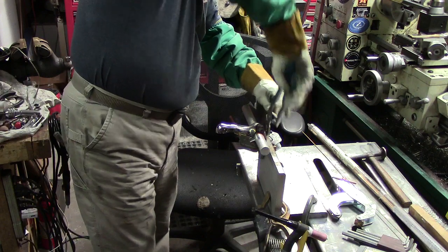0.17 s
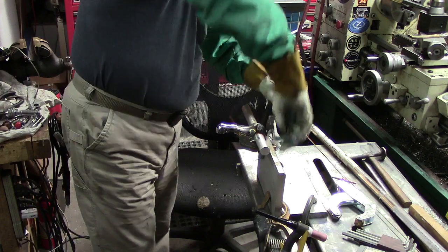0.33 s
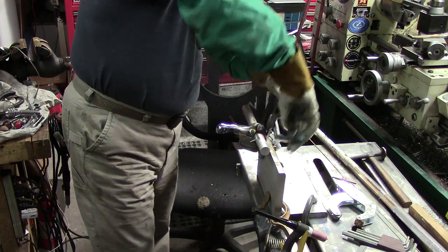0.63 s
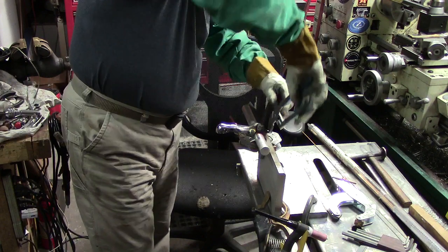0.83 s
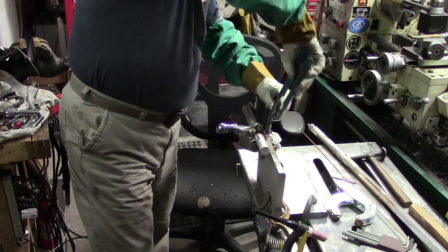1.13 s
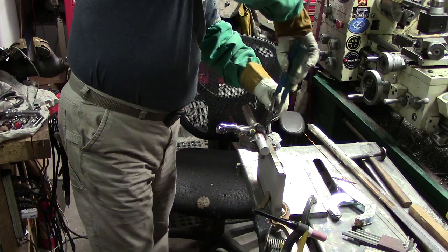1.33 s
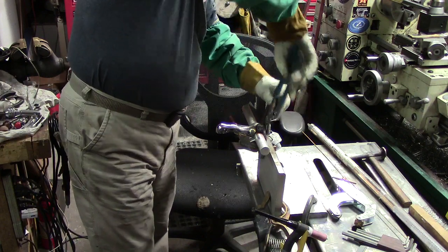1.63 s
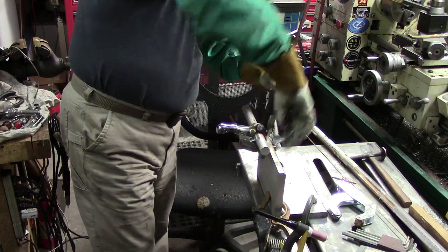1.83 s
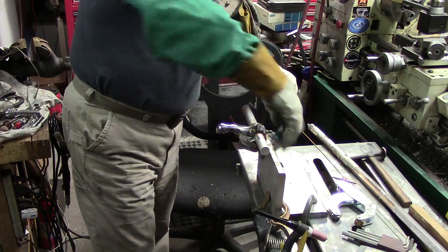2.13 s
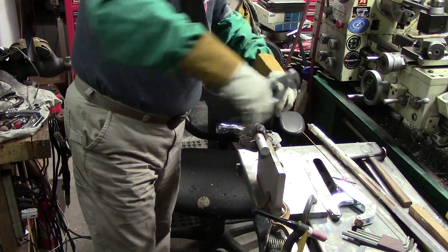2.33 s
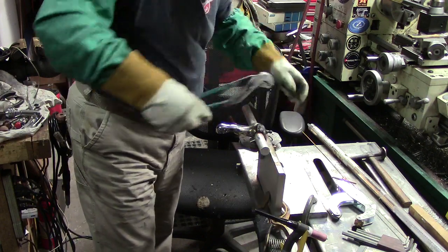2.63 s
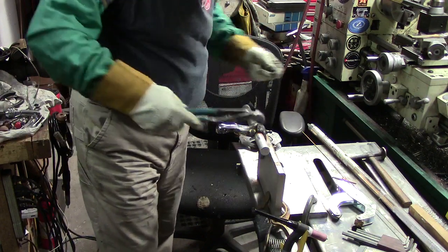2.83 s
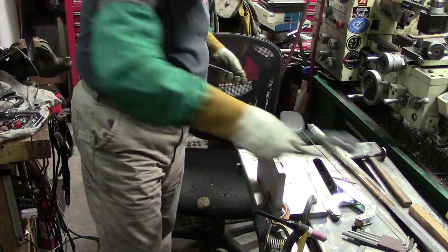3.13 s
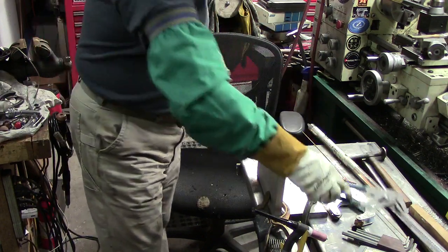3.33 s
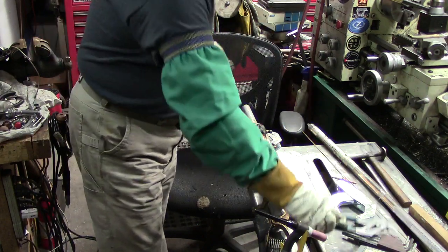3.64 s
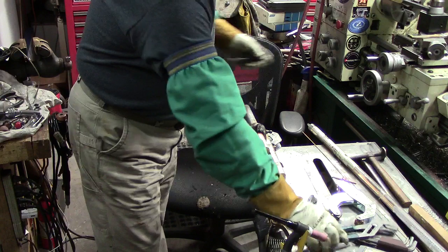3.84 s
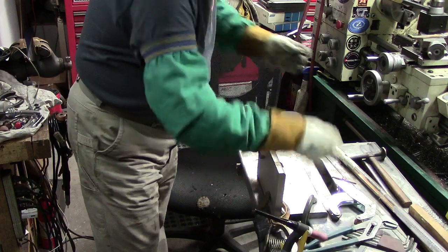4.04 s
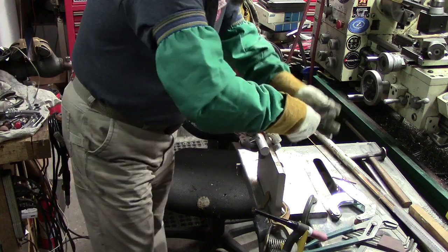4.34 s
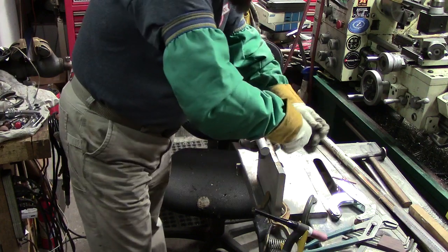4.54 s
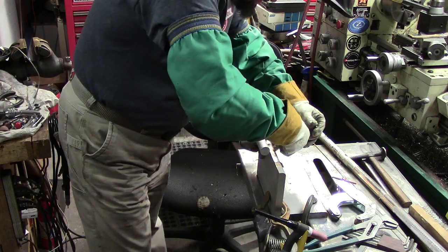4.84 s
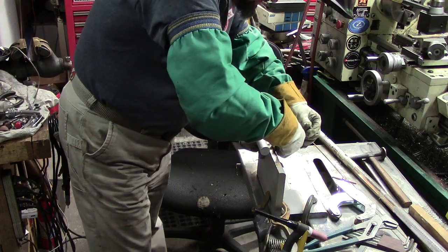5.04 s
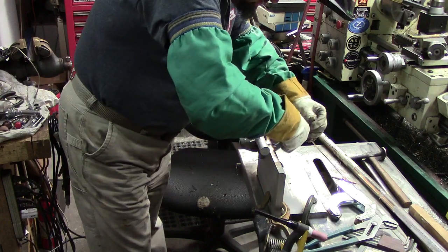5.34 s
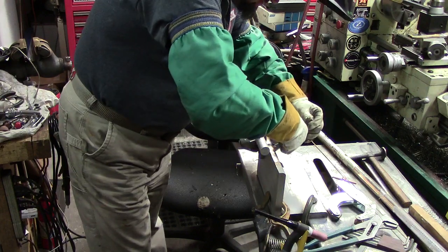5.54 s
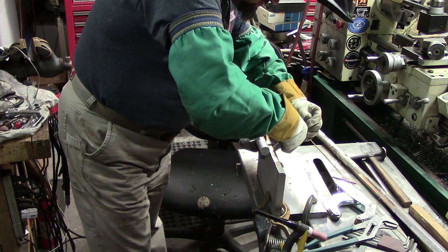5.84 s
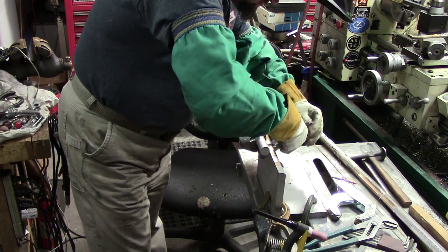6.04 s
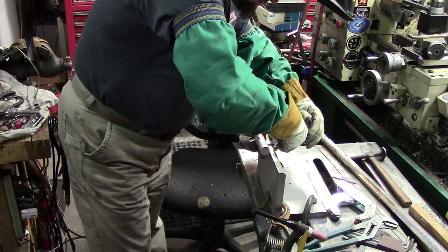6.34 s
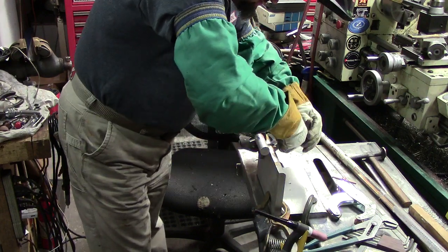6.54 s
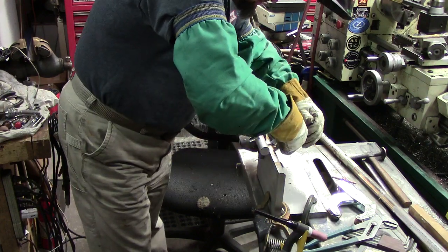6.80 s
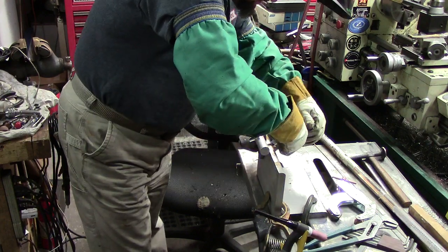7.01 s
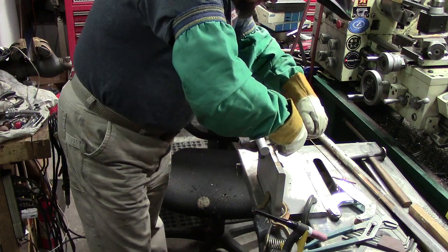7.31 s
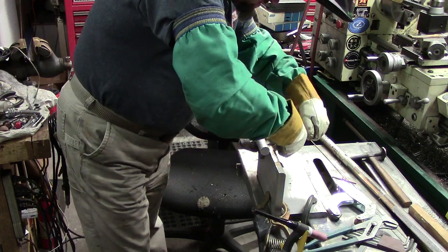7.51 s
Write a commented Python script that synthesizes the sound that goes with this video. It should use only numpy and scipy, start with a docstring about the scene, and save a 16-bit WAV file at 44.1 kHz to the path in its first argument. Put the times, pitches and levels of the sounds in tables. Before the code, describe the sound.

Steady low fan hum and rushing air, then a sharp metal clack, a loud wrench clatter on a bench, loose tool clinks and faint steel ticks.

```python
"""A steel wrench clacks free of a clamped part and lands on a steel bench, with light steel ticks on the part
before and after: each contact is a noise crack, a grainy rattle and ringing sines with a room tail.
Loose tools clink as a torch is lifted. Arm sweeps add soft low gusts of noise.
Behind it a TIG welder's fan drones: a blade tone with fainter whines over coloured noise for the rushing air.
A limiter ducks the whole sound under loud blows."""
import sys
import numpy as np
from scipy import signal
from scipy.fft import rfft, irfft, next_fast_len
from scipy.io import wavfile
from scipy.ndimage import uniform_filter1d, map_coordinates

SR = 44100
rng = np.random.default_rng(int(sys.argv[2]) if len(sys.argv) > 2 else 0)


def pcm_store(signal):
    """Save signal as 16-bit PCM."""
    levels = np.round(np.clip(np.atleast_2d(signal), -1, 1) * 32767)
    wavfile.write(sys.argv[1], SR, levels.astype(np.int16).T)


N = 338107


def amp(db):
    """Turn decibels into a gain."""
    return 10 ** (np.asarray(db) / 20)


def unit(x):
    """Scale a sound to an rms level of 1."""
    return x / np.sqrt(np.mean(x ** 2) + 1e-20)


def along(points, hz):
    """Read a curve of (Hz, value) points, joined by straight lines on a log frequency axis."""
    point_hz, value = np.transpose(points)
    return np.interp(np.log(hz + 1), np.log(point_hz), value)


def wobble(rate):
    """Draw a smooth random curve through `rate` random points a second."""
    points = rng.standard_normal(int(N * rate / SR) + 4)
    return map_coordinates(points, [np.arange(N) * rate / SR])


def filtered(x, response):
    """Change the strength of each frequency by the gain that response(hz) gives."""
    size = x.shape[-1]
    padded = next_fast_len(size + 8192)
    spectrum = rfft(x, padded) * response(np.fft.rfftfreq(padded, 1 / SR))
    return irfft(spectrum, padded)[..., :size]


def add(track, start_s, sound):
    """Mix a sound into a track from start_s on, cut off at the track's end."""
    start = round(start_s * SR)
    part = sound[..., :N - start]
    track[..., start:start + part.shape[-1]] += part


def strike(modes, spectrum, ring_db, rattle_t60, blur_hz, tilt_db=0, focus_hz=5000, focus_db=0, crack_db=-20):
    """Steel meets steel: a crack, then leading modes (ringing tones) over a rattle that differs each time."""
    ripple_hz, ripple_depth_db = 90, 4  # spacing and unevenness of the lesser resonances
    grain_rate, grain_depth_db = 450, 3.2  # level points per s and unevenness of the micro-contacts
    focus_octaves = .15  # half-width of the favoured band
    crack_t60 = .006  # s to fall by 60 dB, as for every t60 here
    t = np.arange(SR // 2) / SR
    # one column vector each, so that every mode gets its own row in time
    hz, mode_db, mode_t60 = np.transpose(modes)[:, :, None]

    def contact_db(f):
        """The brightness slope (dB per octave) and the favouring of tones near the point of contact's own."""
        slope_db = tilt_db * np.log2((f + 500) / 5000)
        octaves_away = np.log2((f + 1) / focus_hz)
        nearness = 1 / (1 + (octaves_away / focus_octaves) ** 2)
        return slope_db + focus_db * (nearness - 1)

    strength = amp(mode_db + contact_db(hz) + rng.standard_normal(hz.shape))
    # a random walk of the phase blurs each tone over about blur_hz
    step = np.sqrt(2 * np.pi * abs(blur_hz) / SR)
    chatter = np.cumsum(rng.standard_normal((len(hz), len(t))), axis=1) * step
    tones = np.sin(2 * np.pi * (hz * t + rng.random(hz.shape)) + chatter)
    ring = np.sum(strength * amp(-60 * t / mode_t60) * tones, axis=0)

    knots_hz = np.arange(0, SR / 2, ripple_hz)
    ripple_db = ripple_depth_db * rng.standard_normal(len(knots_hz))
    knots_s = np.arange(0, .5, 1 / grain_rate)
    grain_db = grain_depth_db * rng.standard_normal(len(knots_s))
    grains = unit(amp(np.interp(t, knots_s, grain_db)))

    def rattle_gain(f):
        """The rattle's spectrum with its lesser resonances."""
        return amp(along(spectrum, f) + contact_db(f) + np.interp(f, knots_hz, ripple_db))

    cloud = unit(filtered(rng.standard_normal(len(t)), rattle_gain))
    rattle = grains * cloud * amp(-60 * t / rattle_t60)
    attack = np.minimum(t / .0003, 1)
    crack = amp(crack_db - 60 * t / crack_t60) * rng.standard_normal(len(t))
    return crack + attack * (amp(ring_db) * ring + rattle)


def in_shop(sound, wet_db, side_db=1):
    """The direct sound, then the cluttered room's fading answer, wide and largely different at each microphone."""
    # how long the room rings: pitch_hz, t60_s (time to fall by 60 dB)
    room_ring = [(200, 0.79), (2000, 0.17), (6000, 0.33), (10000, 0.19), (15000, 0.35)]
    hz, t, grid = signal.stft(rng.standard_normal((2, SR // 2)), SR, nperseg=256)
    fade = amp(-60 * t / along(room_ring, hz)[:, None])
    tail = signal.istft(grid * fade, SR, nperseg=256)[1]
    # the answer starts 1/300 s after the direct sound
    tail = np.pad(tail, ((0, 0), (SR // 300, 0)))
    tail = tail / np.linalg.norm(tail[0])
    mid, side = signal.fftconvolve(sound[None], tail, axes=1)[:, :len(sound)]
    side = amp(side_db) * side
    return sound + amp(wet_db) * np.array([mid + side, mid - side])


def arm_gusts():
    """A sweeping arm pushes air at the microphones: low noise that swells and fades over a faint draught."""
    # sweeps of the arm: peak_s, level_db, length_s (between the points of half strength)
    arm_sweeps = [(.13, -46, 0.49), (1.752, -32, 0.077), (3.22, -48, 0.22)]
    # colour of the moving air: pitch_hz, level_db (per Hz, relative)
    gust_colour = [(20, -5), (50, 2), (80, -5), (115, -2), (200, -16), (600, -84)]
    draught_db = -55.5  # the faint draught between sweeps
    t = np.arange(N) / SR
    flow = amp(draught_db)
    for peak_s, level_db, length_s in arm_sweeps:
        flow = flow + amp(level_db) / (1 + (2 * (t - peak_s) / length_s) ** 4)
    noise = rng.standard_normal((2, N))
    return flow * unit(filtered(noise, lambda f: amp(along(gust_colour, f))))


def fan_air():
    """Air rushes turbulently through the louvres: noise coloured by the case and rippled by standing waves."""
    # colour of the rushing air: pitch_hz, level_db (per Hz, relative)
    air_colour = [(25, -31), (50, -26.5), (90, -18), (150, -9.5), (215, 0), (280, -11.5), (600, -10.5),
                  (1700, -8), (2600, -15), (3700, -18.5), (4700, -25.5), (6000, -27.5), (8200, -36.5),
                  (11000, -43), (15000, -57)]
    # resonances of the case: pitch_hz, width_hz, lift_db
    case_resonances = [(191.4, 10.5, 12.5), (307, 28, 4), (340, 18.4, 6.5), (363.4, 16.6, 7.5),
                       (426.5, 79, 8), (498, 16, 4), (600.6, 7.3, 7.5), (716, 61, 4), (804, 54, 4.5),
                       (903, 26, 5.5), (1039, 27, 7), (1100, 20, 2.5), (1206, 31, 3.5), (1315, 49, 4),
                       (1505, 16, 7), (1564, 16, 3.5), (1740, 12, 5), (2640, 13, 5.5), (4420, 25, 5.5)]
    # difference between the two microphones: pitch_hz, side_minus_mid_db
    mic_spread = [(30, -7), (80, -11), (130, -18), (190, -25), (280, -24), (400, -24), (1300, -21.5),
                  (2800, -16.5), (6000, -12), (14000, -11)]
    knots_hz = np.arange(0, SR / 2, 22)
    # the fine ripple grows towards the treble
    ripple_depth_db = along([(1200, 0), (2200, 1.5)], knots_hz)
    ripple_db = rng.standard_normal(len(knots_hz)) * ripple_depth_db

    def air_gain(f):
        """Gain for the mid (both microphones alike) and the side (their difference)."""
        case_db = sum(lift_db / (1 + (2 * (f - hz) / width_hz) ** 2) for hz, width_hz, lift_db in case_resonances)
        colour = amp(along(air_colour, f) + case_db + np.interp(f, knots_hz, ripple_db))
        return colour * np.array([np.ones_like(f), amp(along(mic_spread, f))])

    mid, side = filtered(rng.standard_normal((2, N)), air_gain)
    level_db = -22.5 + 0.41 * wobble(5)
    return amp(level_db) * unit(np.array([mid + side, mid - side]))


def fan_tones():
    """Five blades chop the air at a nearly steady speed; uneven inflow makes the tone sway and flutter."""
    blade_hz, blades = 241.03, 5  # blade passages per s, blades on the shaft
    flutter_db, flutter_rate = 1.04, 26  # depth in dB, random points per s
    # the blade tone swelling and sinking in the room: time_s, level_db (before the left-right balance)
    drone_level = [(0.0, -17.5), (0.66, -16.5), (1.22, -18.5), (1.26, -16.5), (2.78, -18), (2.79, -17.5),
                   (3.63, -17), (3.66, -21), (4.05, -18.5), (4.16, -16.5), (4.22, -21.5), (4.31, -15.5),
                   (4.69, -18.5), (4.77, -16), (4.89, -21), (4.92, -17), (7.6, -18.5)]
    # weaker tones of the fan: multiple_of_shaft_speed, level_db (before the left-right balance)
    whine_tones = [(4, -42), (10, -42.5), (20, -43.5), (24, -43.5)]
    t = np.arange(N) / SR
    shaft = 2 * np.pi * blade_hz / blades * t + 0.022 * wobble(0.86)
    level_db = np.interp(t, *np.transpose(drone_level)) + flutter_db * wobble(flutter_rate)
    # reflections reach the two microphones slightly out of step
    lead = np.array([[1], [-1]]) * (0.032 + 0.014 * wobble(20))
    blade = amp(level_db) * np.sin(blades * shaft + 0.047 * wobble(22) + lead)
    whine = 0
    for order, whine_db in whine_tones:
        strength = amp(whine_db + 1.3 * wobble(7.1))
        whine = whine + strength * np.sin(round(order) * shaft + 0.35 * wobble(6.5))
    balance = amp([[.3], [-.3]])  # left a little louder than right
    return np.sqrt(2) * (blade + whine) * balance


def loose_tools():
    """Lifting the torch off the bench jostles the loose tools: a quick run of small clinks."""
    # the small contacts: start_s, level_db, brightness_db_per_octave
    nudges = [(4.0215, -20, -6), (4.0255, -28, 2), (4.0298, -22, 1), (4.039, -22, -6), (4.0445, -24.5, -4),
              (4.052, -29, -2), (4.06, -27, -2), (4.073, -28, -1), (4.088, -30, -2), (4.108, -34, -1)]
    # modes of the tools: pitch_hz, level_db, t60_s
    tool_modes = [(1520, 8, .04), (2630, -2, .09), (3020, -4, .15), (3500, -5, .06), (5340, 0, .06),
                  (5640, 1, .07), (6840, -1, .06), (7340, -3, .1), (8710, -7, .1), (9400, -11, .09),
                  (10600, -11, .11)]
    # colour of the rattle: pitch_hz, level_db (per Hz, relative)
    jostle_colour = [(300, -11), (650, 7), (1000, 6), (1700, 7), (3300, 1), (4700, -2), (6000, -1),
                     (8500, -7), (11300, -15), (12500, -27), (15500, -42)]
    out = np.zeros((2, N))
    for start_s, level_db, tilt_db in nudges:
        clink = strike(tool_modes, jostle_colour, ring_db=-10, rattle_t60=.075, blur_hz=70,
                       tilt_db=tilt_db, crack_db=-25)
        add(out, start_s, amp(level_db) * in_shop(clink, wet_db=-14))
    return out


def part_ticks():
    """Steel lightly touches the clamped part; where it is touched decides which of its modes lead."""
    # the touches: start_s, level_db, most_excited_hz
    touches = [(0.368, -50, 10900), (0.5194, -38, 10900), (0.9674, -44, 9900), (0.9935, -42, 9900),
               (0.9994, -42, 10000), (1.0294, -44, 8580), (1.11, -45, 7300), (1.897, -43, 10000),
               (1.905, -38, 6700), (5.2101, -38, 10900), (5.217, -39, 6500), (5.231, -41, 6500),
               (5.4899, -33, 3400), (5.494, -34.5, 6750), (5.742, -37, 3300), (7.6535, -42, 11200),
               (7.658, -32.5, 8500)]
    # modes of the clamped part: pitch_hz, level_db, t60_s
    part_modes = [(3570, -2, .06), (6450, -1, .08), (6800, 0, .08), (7500, -3, .06), (8750, 3.5, .1),
                  (9920, -5, .08), (10950, -4, .08), (11900, -12, .06)]
    # colour of the rattle: pitch_hz, level_db (per Hz, relative)
    touch_colour = [(1500, -4), (3400, 11), (4800, 0), (7000, -1), (10500, -10), (12500, -17), (15500, -28)]
    out = np.zeros((2, N))
    for start_s, level_db, focus_hz in touches:
        tick = strike(part_modes, touch_colour, ring_db=-0.5, rattle_t60=0.05, blur_hz=70,
                      focus_hz=focus_hz, focus_db=15)
        add(out, start_s, amp(level_db) * in_shop(tick, wet_db=-10))
    return out


def wrench_on_bench():
    """The wrench lands, bounces and settles among other tools; each contact wakes other modes of the bench."""
    # the contacts: start_s, level_db, brightness_db_per_octave, most_excited_hz
    landings = [(3.7304, -6, 4.5, 8600), (3.7335, -12, -0.5, 4400), (3.7405, -16.5, -4, 4050),
                (3.746, -16, -4.5, 2680), (3.762, -22, -2, 3500), (3.772, -21, 1, 5560),
                (3.786, -22, 2, 4750), (3.7977, -19, 4, 8250), (3.811, -21, -3, 2100),
                (3.828, -25.5, 1, 4750), (3.849, -32, 1, 5560), (3.9205, -30.5, -0.5, 9400)]
    # modes of the steel bench and what lies on it: pitch_hz, level_db, t60_s
    bench_modes = [(704, 0, 0.36), (1060, -8, 0.28), (1828, 3, 0.31), (2133, 1, 0.37), (2680, 0, 0.32),
                   (2977, 5, 0.23), (3610, -6, 0.45), (4030, 2, .17), (4670, 3, 0.12), (4791, -5, .4),
                   (5566, -1, 0.44), (6350, 1, .15), (6850, 7, 0.12), (8000, -2, 0.2), (8500, 1, .14),
                   (9350, -1, 0.09), (9950, -8, .1), (10800, -10, .13)]
    # colour of the rattle: pitch_hz, level_db (per Hz, relative)
    clatter_colour = [(300, -12), (700, 0.5), (1800, 2), (3000, 1.5), (5500, -1), (7500, -4.5), (9000, -6),
                      (10500, -12), (12300, -16), (13200, -33), (15500, -40)]
    out = np.zeros((2, N))
    for start_s, level_db, tilt_db, focus_hz in landings:
        # softer contacts crack less
        clank = strike(bench_modes, clatter_colour, ring_db=-15, rattle_t60=.115, blur_hz=38,
                       tilt_db=tilt_db, focus_hz=focus_hz, focus_db=4, crack_db=-4 + .7 * level_db)
        add(out, start_s, amp(level_db) * in_shop(clank, wet_db=-19))
    return out


def wrench_clack():
    """The wrench's jaws snap off the part in a few quick contacts; the gloved hand damps their ring."""
    # the contacts: start_s, level_db, most_excited_hz
    clacks = [(2.8238, -15, 3850), (2.8264, -11, 3850), (2.8275, -19, 9300), (2.8343, -16.5, 10500),
              (2.8385, -20, 5400), (2.847, -22, 5500), (2.872, -33, 6900)]
    # modes of the wrench: pitch_hz, level_db, t60_s
    wrench_modes = [(2135, 3.5, 0.11), (3850, 9.5, 0.042), (5400, 4, 0.071), (5600, 1, .06),
                    (6170, 0, 0.085), (6880, 0, 0.22), (7500, -9, 0.1), (8660, -3, .06), (9125, 3, .07),
                    (9800, -5, .08), (10700, 0, 0.06), (11950, -3, .07), (14700, -8, .1)]
    # colour of the rattle: pitch_hz, level_db (per Hz, relative)
    jaw_colour = [(800, -9), (2000, -3), (2800, -4), (3850, 4), (4400, -3), (5500, 0), (7500, -4),
                  (9500, 5), (11000, -2), (12000, -5), (13000, -13), (14800, -6), (15700, -17)]
    soft_dulling = .12  # dB per octave of dulling for each dB below the hardest contact
    out = np.zeros((2, N))
    hardest_db = max(level_db for _, level_db, _ in clacks)
    for start_s, level_db, focus_hz in clacks:
        tilt_db = soft_dulling * (level_db - hardest_db)
        clack = strike(wrench_modes, jaw_colour, ring_db=-9, rattle_t60=.056, blur_hz=95,
                       tilt_db=tilt_db, focus_hz=focus_hz, focus_db=6, crack_db=-8)
        add(out, start_s, amp(level_db) * in_shop(clack, wet_db=-17.0))
    return out


def scene():
    """The air and the fan behind, the tools and the wrench in front."""
    background = arm_gusts() + fan_air() + fan_tones()
    return background + loose_tools() + part_ticks() + wrench_on_bench() + wrench_clack()


def record(dry):
    """A limiter ducks everything under a loud blow, recovers steadily and rounds peaks; the top is cut off."""
    ceiling_db = -6.5  # short-term rms level above which the ducking starts
    release_db_per_s = 39  # speed of recovery
    clip_db = -5.5  # level at which peaks are rounded off
    top_hz = 15800  # nothing passes from here up
    window = SR // 250  # 4 ms
    power = uniform_filter1d(np.mean(dry ** 2, axis=0), window)
    level_db = 10 * np.log10(np.abs(power) + 1e-12)
    # hold the deepest ducking so far, less what has been recovered since
    recovery_db = release_db_per_s * np.arange(N) / SR
    excess_db = np.maximum(0, level_db - ceiling_db)
    duck_db = np.maximum.accumulate(excess_db + recovery_db) - recovery_db
    ducked = dry * amp(-duck_db)
    rounded = ducked / (1 + np.abs(ducked / amp(clip_db)) ** 8) ** (1 / 8)
    return filtered(rounded, lambda hz: hz < top_hz)


dry = scene()
out = record(dry)
pcm_store(out)
```